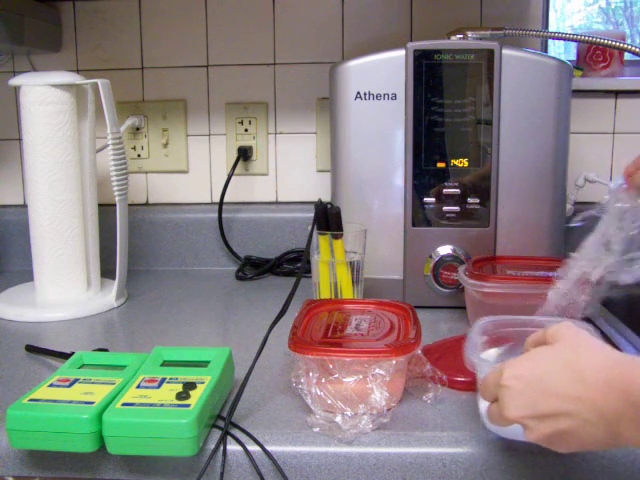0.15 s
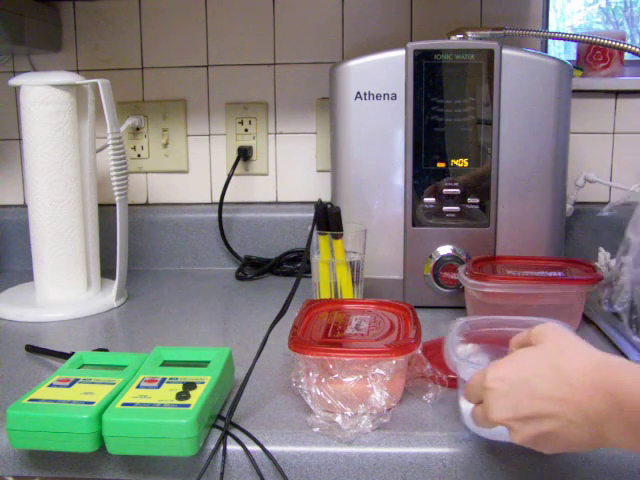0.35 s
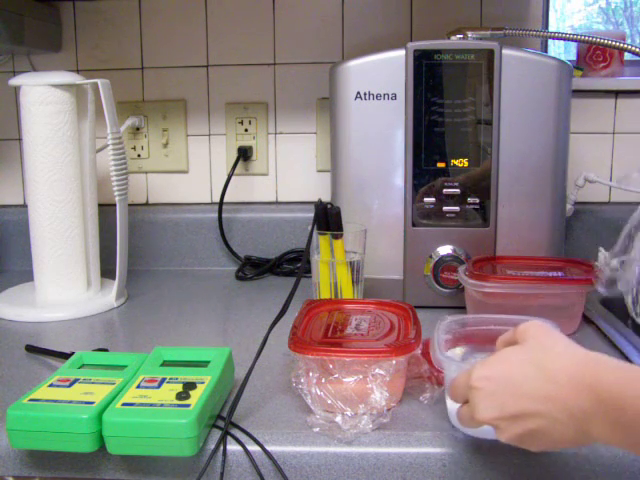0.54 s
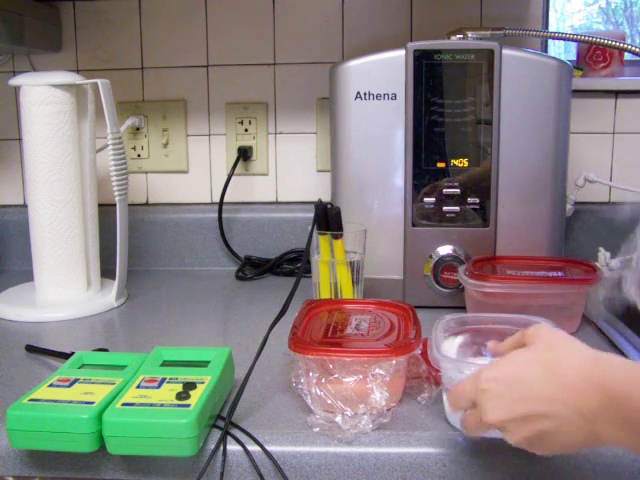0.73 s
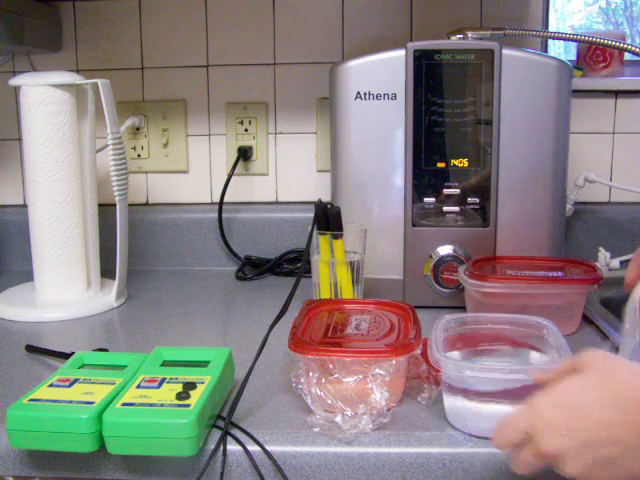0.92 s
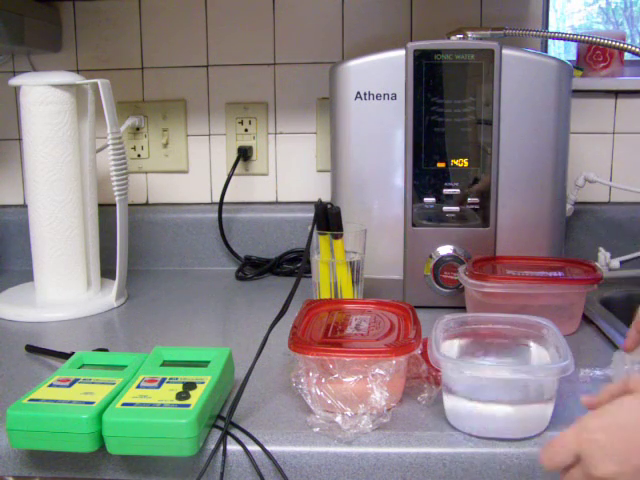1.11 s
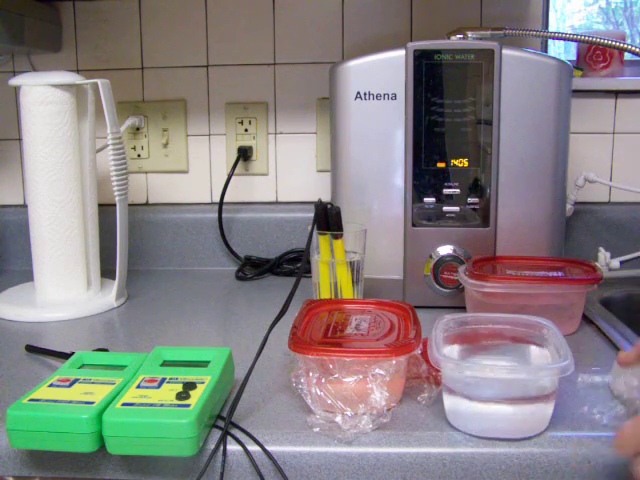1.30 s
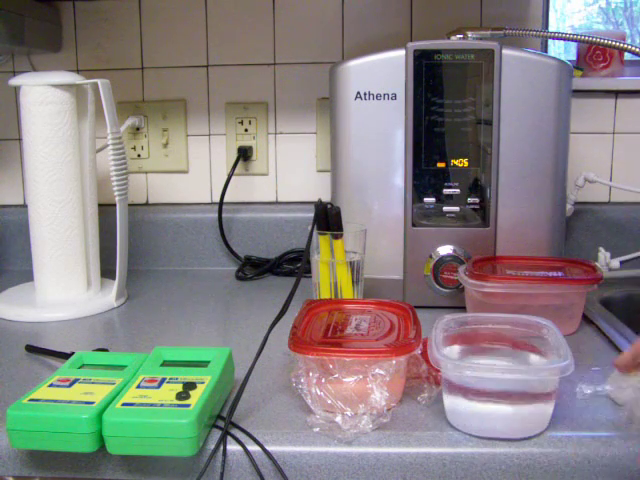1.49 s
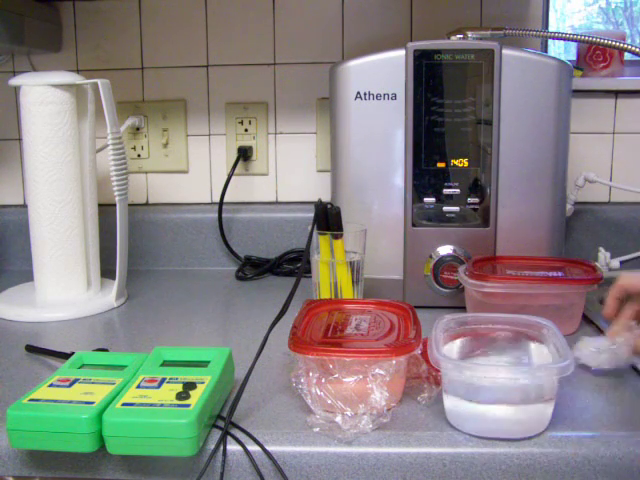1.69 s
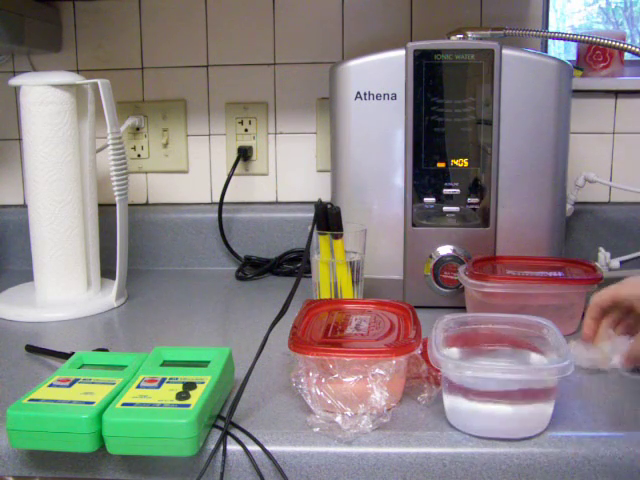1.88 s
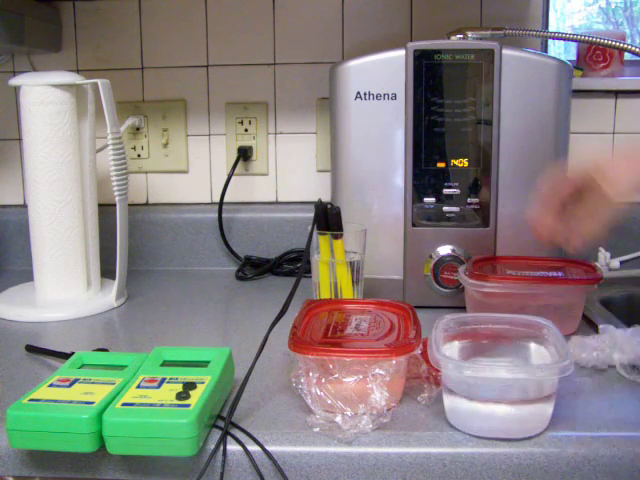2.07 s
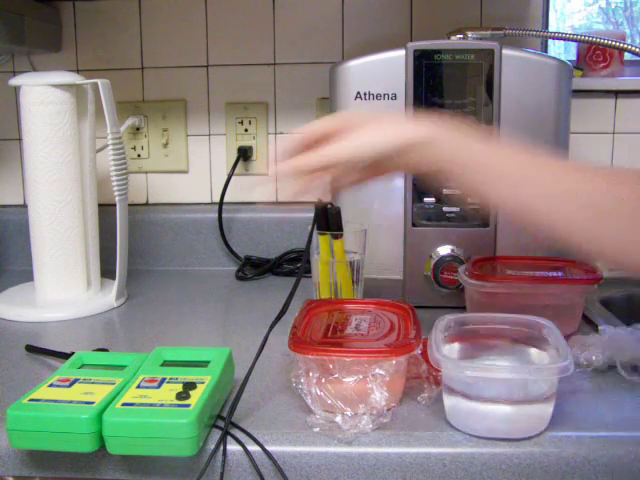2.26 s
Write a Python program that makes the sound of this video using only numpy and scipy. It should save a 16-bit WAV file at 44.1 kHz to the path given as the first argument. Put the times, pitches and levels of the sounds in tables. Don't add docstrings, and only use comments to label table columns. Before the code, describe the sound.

Cling film peeled with a bright hard rip, a hollow tub slide and set-down, then duller crinkling squeezes with scattered ticks, heard close in a slightly reverberant kitchen through a small camera microphone with appliance rumble.

```python
import sys
import numpy as np
from scipy import signal
from scipy.fft import rfft, irfft
from scipy.io import wavfile
from scipy.ndimage import uniform_filter1d

SR = 44100
rng = np.random.default_rng(int(sys.argv[2]) if len(sys.argv) > 2 else 0)


def transcribe(signal):
    frames = np.atleast_2d(signal).T
    limited = np.clip(frames, -1, 1)
    pcm = np.round(limited * 32767).astype(np.int16)
    wavfile.write(sys.argv[1], SR, pcm)


def ratio_of_db(decibels):
    return 10 ** (np.asarray(decibels, float) / 20)


N = 103635


def evened(x):
    return x / np.sqrt(np.mean(x ** 2) + 1e-20)


def read(points, hz):
    f, value = np.transpose(points)
    return np.interp(np.log(hz + 1), np.log(f + 1), value)


def control(rows, order=1, off=-120):
    rows = np.array(rows)
    return np.interp(np.arange(N) / SR, rows[:, 0], rows[:, order], left=off, right=off)


def add(mix, start_s, sound):
    part = mix[round(start_s * SR):][:len(sound)]
    part += sound[:len(part)]


def colour(x, points):
    hz = abs(np.fft.fftfreq(4096, 1 / SR))
    log_gain = np.log(ratio_of_db(np.maximum(read(points, hz), -100)))
    taps = np.fft.ifft(np.exp(signal.hilbert(log_gain).conj())).real[:2048]
    return signal.oaconvolve(x, taps)[:len(x)]


def resonate(x, hz, width_hz):
    return signal.lfilter(*signal.iirpeak(hz, hz / max(width_hz, 5), SR), x)


def resonate_twice(x, hz, width_hz):
    return evened(resonate(resonate(x, hz, width_hz), hz, width_hz))


def sparks(per_s, spread_db, clump_db):
    chance = rng.random(N)
    size = np.minimum(rng.exponential(1, N), 4.0)
    noise = rng.standard_normal(N)
    clump = evened(uniform_filter1d(uniform_filter1d(noise, size=300), size=300))
    level = ratio_of_db(spread_db * size + clump_db * clump)
    return evened((chance < per_s / SR) * np.sign(noise) * level)


# hz, level_db
AIR = [(15, -10), (30, -9.5), (140, -5.5), (280, -9.5), (1300, -15), (2500, -17), (3800, -9.5), (9000, -14)]


def air():
    gain = ratio_of_db(read(AIR, np.fft.rfftfreq(N, 1 / SR)))
    return ratio_of_db(-50) * evened(irfft(rfft(rng.standard_normal(N)) * gain, N))


# pitch_hz, width_hz, level_db
TUB = [(1124, 97, -3.5), (1274, 180, -1.5), (1670, 420, 6), (1940, 250, -2.5), (2380, 180, -10),
       (2970, 190, 3.5), (3880, 130, -0.5)]


def walls(x):
    rung = sum(ratio_of_db(db) * evened(resonate(x, hz, width_hz)) for hz, width_hz, db in TUB)
    above_lowest_mode = signal.butter(6, 953, "high", fs=SR, output="sos")
    return evened(signal.sosfilt(above_lowest_mode, rung))


def grain(hz, cycles):
    t = np.arange(400) / SR
    ring = np.sin(2 * np.pi * hz * t) * np.exp(-t * hz / cycles)
    return ring / np.linalg.norm(ring)


# hz, level_db
FILM = [(100, -29), (300, -17.5), (950, -22), (2000, -11), (3500, -3), (5000, -3.5), (7000, -11.5),
        (12000, -13)]
# hz, level_db
TAUT = [(300, -11), (1000, -19.5), (2700, -16.5), (3700, -8.5), (4300, 1.5), (5500, -6), (8000, -3)]
# start_s, level_db, tub_share_db, sheen_db
PEEL = [
    (0, -42.5, -12.5, -17),
    (.06, -44.5, -5.5, -15),
    (.14, -60, -7.5, -23),
    (.165, -41.5, -8.5, -21.5),
    (.201, -46.5, -5.5, -7.5),
    (.206, -30.5, -6, -2.5),
    (.255, -37.5, -4.5, -5.5),
    (.262, -35.5, -11, 12),
    (.34, -50.5, 3, -15.5),
]
# start_s, level_db, dull_share, sheen_db
BUNCH = [
    (.912, -60, .2, -12),
    (.917, -34.5, 0.077, -11),
    (.945, -42, .2, -10),
    (.96, -40, 0.23, -11),
    (1.03, -38, .2, -7.5),
    (1.09, -38.5, 0.24, -4),
    (1.17, -36, 0.35, -17),
    (1.21, -47.5, .2, -12.5),
    (1.3, -50, .1, -15),
         (1.355, -48.5, .1, -15),
    (1.38, -40.5, .2, -16),
    (1.435, -36.5, .1, -13),
    (1.46, -42, .1, -12),
    (1.51, -41, .1, -10.5),
    (1.545, -47, .2, -11.5),
         (1.56, -37, .4, -11.5),
    (1.605, -36, .2, -11),
    (1.63, -39.5, .2, -13),
    (1.685, -40.5, .2, -13),
    (1.705, -37.5, .2, -3.5),
    (1.74, -43, .2, -6),
    (1.8, -48, .1, -11),
    (1.849, -51.5, .1, -10.5),
         (1.864, -36, 0.17, -13),
    (1.885, -35.5, 0.15, -10),
    (1.95, -41, 0.18, -13),
    (1.98, -37, 0.55, -8),
    (2.025, -40, 0.59, -11),
    (2.06, -51.5, .2, -14),
    (2.14, -54.5, .1, -11),
    (2.22, -63, .1, -10.5),
]
SQUEEZES = BUNCH


def film():
    creases_per_s, spread_db, clump_db = 4500, 2.7, 1.5
    pitches = np.geomspace(500, 9000, num=12)
    creases = np.zeros(N)
    for hz in pitches:
        clicks = sparks(creases_per_s / len(pitches), spread_db, clump_db)
        creases += signal.oaconvolve(clicks, grain(hz, 1.0))[:N] * (hz / 4000) ** 0.54
    bright = evened(colour(creases, FILM))
    dull = signal.sosfilt(signal.butter(2, 1800, fs=SR, output="sos"), bright)
    sheen = resonate_twice(creases, 6500, 5650)

    peel = evened(colour(creases, TAUT))
    peel += ratio_of_db(control(PEEL, order=2)) * walls(creases)
    peel += ratio_of_db(control(PEEL, order=3)) * sheen
    bunch = bright + 1.7 * control(SQUEEZES, order=2, off=0) * dull
    bunch += ratio_of_db(control(SQUEEZES, order=3)) * sheen
    return peel * ratio_of_db(control(PEEL)) + bunch * ratio_of_db(control(SQUEEZES))


# start_s, peak_db, pitch_hz
SNAPS = [(0.0498, -32, 4170), (0.1635, -32, 3660), (0.2069, -15, 3680), (0.2164, -19, 4070),
         (0.2194, -19, 3670), (0.2374, -19, 3690), (0.2484, -17, 3700), (0.2573, -17, 4020),
         (0.2614, -19, 5870), (0.2684, -20, 4060), (0.2884, -20, 3920), (0.4694, -27, 3840),
         (0.4754, -27, 3730), (0.8279, -24, 4430), (0.833, -21, 3790), (0.9168, -25, 3580),
         (0.9244, -28, 3660), (0.9497, -29, 3650), (1.1664, -26, 3950), (1.6994, -24, 3770)]


def snaps():
    out, t = np.zeros(N), np.arange(300) / SR
    for (start_s, db, hz), noise in zip(SNAPS, rng.standard_normal((len(SNAPS), 300))):
        burst = colour(noise * np.exp(-t / 0.00053), FILM)
        ring = np.sin(2 * np.pi * hz * t) * t / .0008 * np.exp(1 - t / 0.00074)
        snap = ring + .9 * burst / abs(burst).max()
        add(out, start_s, ratio_of_db(db - 4.5) * snap / abs(microphone(snap)).max())
    return out


# start_s, peak_db
TICKS = [(0.1714, -32), (0.5014, -27), (0.5554, -29), (0.6294, -32), (1.1423, -22), (1.3029, -33),
         (1.3623, -32), (1.5564, -27), (1.6244, -26), (1.8687, -22), (1.8874, -29), (1.8924, -25),
         (1.8964, -23), (1.9244, -25), (1.9504, -27), (1.9884, -28), (2.0044, -25), (2.0194, -28),
         (2.0334, -29)]


def ticks():
    train = np.zeros(N)
    for start_s, db in TICKS:
        add(train, start_s, ratio_of_db(db + .5) * np.ones(1))
    one_click = microphone(colour(signal.unit_impulse(400), FILM))
    return colour(train, FILM) / abs(one_click).max()


# pitch_hz, width_hz, level_db
RING = [(1169, 42, -4.5), (1305, 41, -7), (1722, 215, 2.5), (2110, 100, -3), (530, 82, -12)]
# start_s, peak_db, ring_db, thud_db
KNOCKS = [
    (0.207, -25, -5, -18),
    (0.8269, -20, -14.5, -33),
    (0.9496, -33.5, -20.5, -8),
    (1.5571, -37, -11, -12),
    (2.004, -41, -18, -6.5),
]


def knocks():
    out, t = np.zeros(N), np.arange(4000) / SR
    ring = np.zeros(len(t))
    for hz, width_hz, db in RING:
        ring += ratio_of_db(db) * np.sin(2 * np.pi * hz * t) * np.exp(-np.pi * width_hz * t)
    ring *= np.minimum(t / 0.002, 1)
    for (start_s, db, ring_db, thud_db), noise in zip(KNOCKS, rng.standard_normal((len(KNOCKS), 4000))):
        settling = np.exp(-t / 0.0013) + .45 * np.exp(-t / .025)
        tick = colour(noise * np.exp(-t / 0.0028), FILM) + colour(noise * settling, TAUT)
        thud = resonate(noise * np.exp(-t / 0.021), 230, 400)
        knock = tick / abs(tick).max()
        knock += ratio_of_db(ring_db) * ring / abs(ring).max()
        knock += ratio_of_db(thud_db) * thud / abs(thud).max()
        add(out, start_s, ratio_of_db(db) * knock)
    return out


# start_s, level_db, hollow_db
SLIDE = [
    (.4, -50, -21),
    (.435, -39.5, -17.5),
    (.445, -41, -7.5),
    (.475, -38.5, -24),
    (.53, -40, -28),
    (.6, -46.5, -31),
    (.675, -41, -32.5),
    (.75, -55.5, -21),
    (.8, -63, -9),
]


def slide():
    grit = sparks(4000, 2.5, 1.5)
    hollow = resonate_twice(grit, 1042, 110)
    scrape = evened(walls(grit) + ratio_of_db(-4) * evened(colour(grit, FILM)))
    return ratio_of_db(control(SLIDE)) * (scrape + ratio_of_db(control(SLIDE, order=2)) * hollow)


# hz, t60_s
KITCHEN = [(200, 0.14), (1000, 0.47), (4000, 0.44), (8000, 0.34)]


def kitchen(x):
    out, turn = 0, 2 * np.pi * 6.0 * np.arange(N) / SR
    for share in (np.cos(turn), np.sin(turn)):
        taps = np.zeros(SR)
        at = np.arange(120, SR - 20, 20)
        taps[at + rng.integers(0, 20, len(at))] = rng.choice([-1., 1.], len(at))
        hz, t, bands = signal.stft(taps, SR, nperseg=256)
        t60_s = np.maximum(read(KITCHEN, hz), .05)[:, None]
        tail = signal.istft(bands * ratio_of_db(-60 * t / t60_s), SR, nperseg=256)[1]
        out = out + signal.fftconvolve(x * share, tail / np.linalg.norm(tail))[:N]
    return out


# hz, level_db
MIC = [(20, -1.5), (3200, 2), (3900, 5), (4700, 0), (7000, -5), (8100, -13.5), (9000, -35.5), (9450, -82.5)]


def microphone(x):
    return colour(x, MIC)


def scene():
    near = ratio_of_db(-4.5) * (film() + slide()) + snaps() + ticks() + knocks()
    return (near + ratio_of_db(-0.5) * kitchen(near) + air())[None]


def top_cut(x):
    return signal.sosfilt(signal.butter(12, 9080, fs=SR, output="sos"), x)


def record(dry):
    mix = microphone(dry[0])[None]
    return top_cut(mix)


dry = scene()
out = record(dry)
transcribe(out)
```